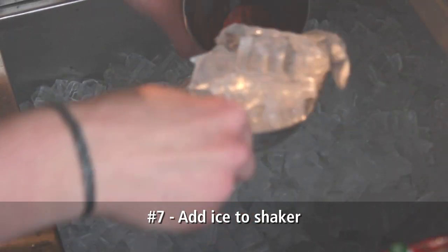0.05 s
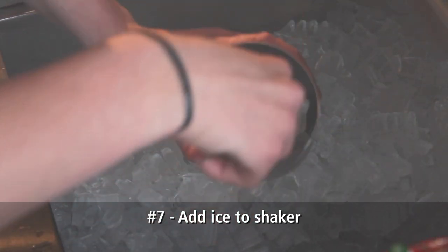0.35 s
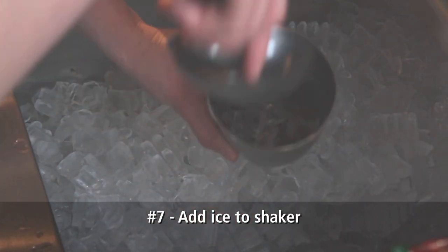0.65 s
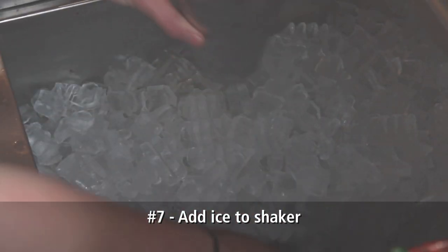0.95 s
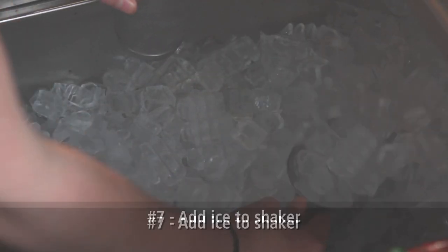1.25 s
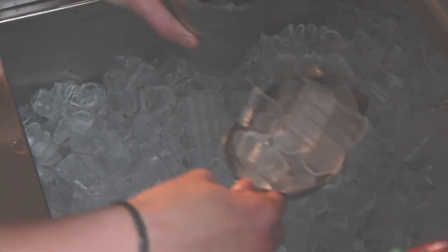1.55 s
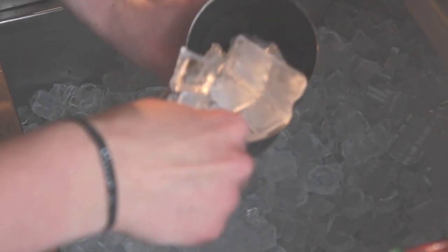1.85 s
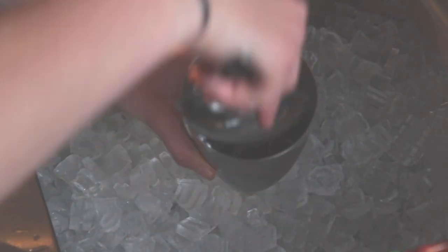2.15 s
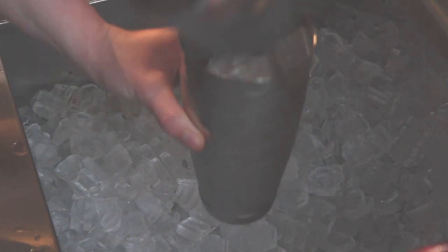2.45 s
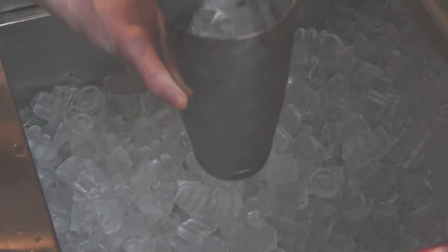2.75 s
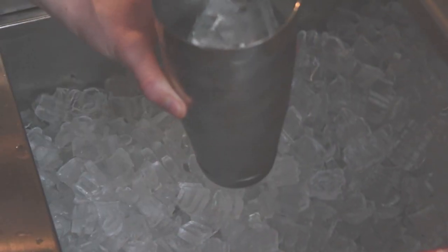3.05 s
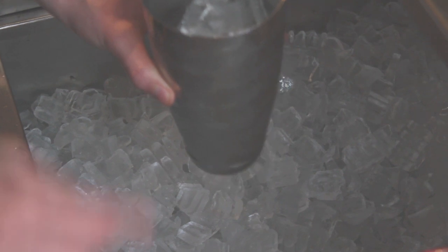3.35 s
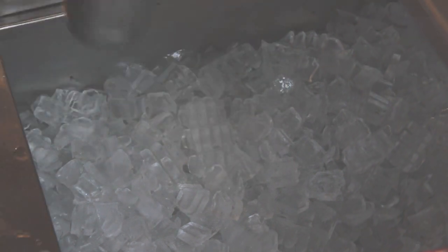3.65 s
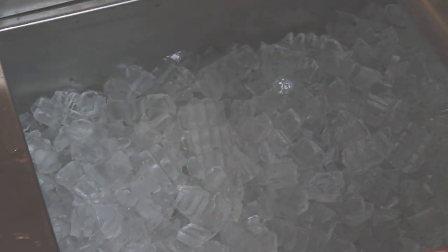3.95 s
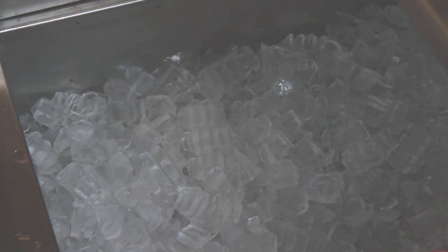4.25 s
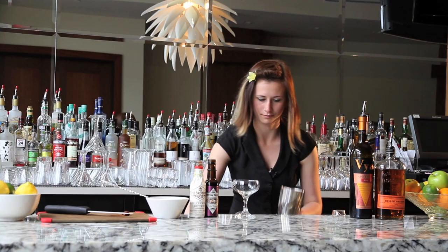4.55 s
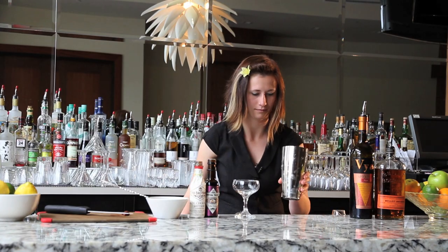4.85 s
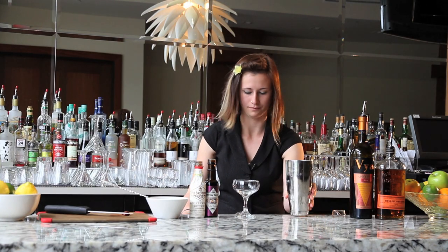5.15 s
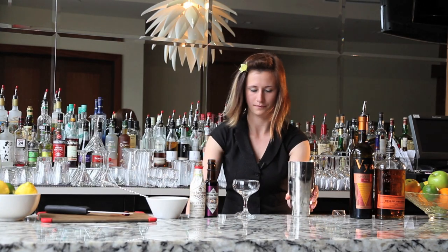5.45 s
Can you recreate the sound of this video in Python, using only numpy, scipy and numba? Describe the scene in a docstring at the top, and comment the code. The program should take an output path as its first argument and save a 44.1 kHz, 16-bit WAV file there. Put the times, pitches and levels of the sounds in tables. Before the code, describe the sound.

At a bar, two scoops of ice tumble into a metal shaker near the microphone, clinking and ringing, with a crunching dig into the ice bin between them. The shaker lands on the ice with a dry crack and some cubes settle. Then come a few more distant steel clanks with slight room echo and a light tap of the shaker on stone, over a quiet ventilation hum.

```python
"""Ice cubes are scooped from a bar's ice well and tipped twice into a steel shaker tin, close by.
Packed cubes crunch, loose ones clink, and single ones clack. They ring the tin's wall and the air inside,
whose pitch rises as it fills. Between pours the scoop is pushed back into the ice and the well booms.
Then, further off in the room, steel knocks and rattles at the well and the tin is set down on the stone
counter. A low rumble follows each jolt, and ventilation and coolers hum behind it all."""
import sys
import numpy as np
from scipy import signal
from scipy.fft import rfft, irfft, next_fast_len
from scipy.io import wavfile
from scipy.ndimage import uniform_filter1d
from numba import njit

SR = 44100
rng = np.random.default_rng(int(sys.argv[2]) if len(sys.argv) > 2 else 0)


def inscribe(sig):
    """Save sig as 16-bit PCM at rate SR to the path in sys.argv[1].

    A 1-D sig is mono; a 2-D sig holds one channel per row.
    Samples are clipped to [-1, 1] before scaling.
    """
    pcm = np.round(np.clip(np.atleast_2d(sig).T, -1, 1) * 32767)
    wavfile.write(sys.argv[1], SR, pcm.astype(np.int16))


N = 247797
TIME = np.arange(N) / SR

# How strong each pitch is when ice hits ice: pitch_hz, level_db
ICE_TONE = [(59, -36.5), (100, -10), (140, -1), (283, -4), (398, 1.5), (535, -2.5), (595, 2), (818, -5),
            (910, -4), (3620, -0.5), (6700, -3.5), (9820, -8), (13200, -5), (16000, -12)]
# The scoop is lifted, emptied, pushed back in, pulled free and emptied again; last, the well's ice slumps.
# start_s, rise_s, hold_s, level_db, fall_db_per_s, looseness (0 packed, 1 loose), lows_db, treble_db
ICE_MOVES = [(0, 0.0017, 0.092, -38, 80, 0.04, -6.5, -5.5),
             (0.336, 0.0082, 0.0034, -42, 128.5, 0.3, 1.5, -4),
             (0.446, 0.15, 0.029, -22, 139.5, 0.27, -13.5, -4),
             (0.928, 0.024, 0.17, -23.5, 222, 0.09, -8, -2), (1.124, 0.031, 0.41, -34, 352, 0.18, -7, -9),
             (1.595, 0.02, 0.021, -36, 171, 0.33, -8, -5.5),
             (1.72, 0.23, 0.005, -39, 257, 0.99, -3.5, -2.5),
             (1.979, 0.056, 0.009, -26, 167, 0.88, -13, -5.5),
             (2.081, 0.16, 0.0085, -25.5, 135, 0.72, -17.5, -4),
             (2.292, 0.036, 0.27, -38.5, 90, 0.82, -6.5, -3.5),
             (3.662, .02, 0.17, -60.5, 87, 0.9, -22.5, -14.5),
             (3.932, 0.063, 0.022, -31.5, 141, 0.82, -15.5, -3)]
def moving_ice():
    """Packed cubes crunch, loose ones tumble. As a move eases, its treble goes first, its lows last."""
    powers, loose = np.zeros((3, N)), np.zeros(N)
    for start, rise, hold, db, fall, looseness, lows_db, treble_db in ICE_MOVES:
        shape_db = swell(start, rise, hold, fall)
        power = undb([db + lows_db + .77 * shape_db, db + shape_db, db + treble_db + 1.3 * shape_db]) ** 2
        powers += power
        loose += looseness * power[1]
    loose = np.clip(loose / powers[1], 0, 1)
    crunch = collisions(per_s=2000, spread_db=2.5, cycles=50, ping_db=-2, crack_t60=.012)
    tumble = collisions(per_s=230, spread_db=2.5, cycles=110, ping_db=-1, crack_t60=.022)
    blend = np.sqrt(1 - loose) * unit(crunch) + np.sqrt(loose) * unit(tumble)
    parts = low_mid_high(through(blend, tone_filter(ICE_TONE)))
    return sum(np.sqrt(power) * steady(part) for power, part in zip(powers, parts))

def swell(start, rise, hold, fall_db_per_s, gather_db=14):
    """A movement builds, holds and dies away. Gives its level in dB, with 0 as full strength."""
    t = TIME - start
    db = -gather_db * np.clip(1 - t / rise, 0, 1) - fall_db_per_s * np.maximum(t - rise - hold, 0)
    return np.where(t < 0, -200, np.maximum(db, -200))

def collisions(per_s, spread_db, cycles, ping_db, crack_t60):
    """Cubes bump at random moments; each bump makes a crack and three short pings."""
    when, chance, life, *pitches = rng.random((16000, 6))[:int(per_s * N / SR)].T
    start = (when * N).astype(int)
    size = undb(-spread_db * np.log(np.maximum(chance, .02)))  # many small bumps, a few big ones
    size[::2] *= -1
    tone = 0
    for pitch in pitches:
        hz = 1300 * (15500 / 1300) ** pitch
        tone = tone + pings(start, hz, cycles * (.5 + life), size * hz, N)
    crack_power = through(np.bincount(start, size ** 2, N), fade(TIME[:SR // 10], crack_t60) ** 2)
    cracks = np.sqrt(np.abs(crack_power)) * rng.standard_normal(N)
    return unit(cracks) + undb(ping_db) * unit(tone)

@njit
def pings(start, hz, cycles, size, n):
    """Struck cubes ring: short tones that each lose 60 dB in the given number of cycles."""
    out = np.zeros(n)
    for k in range(len(start)):
        length = cycles[k] * SR / hz[k]
        wave = size[k] + 0j
        step = np.exp(2j * np.pi * hz[k] / SR - np.log(1000) / length)
        for i in range(start[k], min(start[k] + int(length), n)):
            wave *= step
            out[i] += wave.imag
    return out

# Single cubes hit the scoop, the tin or each other: start_s, level_db, pitch_hz, treble_db, chatter_s
CUBE_HITS = [(0.1441, -21, 2980, -11, 0.068), (0.2274, -23, 2660, -8.5, 0.077),
             (0.2845, -22.5, 3700, -18, 0.05), (0.3421, -23.5, 4700, -11, 0.05),
             (0.416, -14.5, 4870, -10, 0.12), (0.4787, -18.5, 4200, -8, 0.065),
             (0.5066, -14, 3200, -14, 0.034), (0.5574, -5, 3070, -15, 0.11),
             (0.7484, -18, 3610, -16, 0.036), (0.7905, -27, 3520, -4, 0.031), (0.9333, -11, 4440, -5, 0.15),
             (0.9928, -7, 3740, -2, 0.041), (1.0367, -9.5, 3290, -16.5, 0.064),
             (1.648, -18, 3060, -9, 0.056), (1.6785, -16, 3620, -21, 0.029),
             (1.7407, -24.5, 3560, -16, 0.05), (1.7539, -18.5, 4760, -15, 0.083),
             (1.7973, -20, 3780, -13, 0.072), (1.8203, -18.5, 4690, -13, 0.078),
             (1.8574, -18, 3710, -15, 0.038), (1.8923, -13, 2830, -4, 0.037),
             (1.9797, -9.5, 2225, -14, 0.05), (2.0081, -9, 2650, -8, 0.07), (2.0303, -9.5, 3870, -22, 0.08),
             (2.0426, -9, 2590, -9, 0.067), (2.375, -13.5, 3880, -39, 0.042),
             (2.4233, -19, 4860, -35, 0.05), (2.4718, -15.5, 3900, -17, 0.11),
             (2.517, -13, 4240, -11, 0.13), (2.5553, -15.5, 3620, -10, 0.097),
             (2.6913, -21, 5200, -4, 0.061), (2.7249, -21.5, 2520, 16, 0.023),
             (3.685, -40.5, 4700, -6.5, 0.056), (3.923, -20.5, 4090, -8.5, 0.035),
             (3.9789, -16.5, 4230, -3, 0.077)]
# The tin touches the ice, then rests its full weight: start_s, level_db, pitch_hz, lows_db, treble_db
TIN_LANDINGS = [(2.828, -21.5, 2500, -14, -12), (2.8549, -7.5, 3480, -4.5, 2)]
def clacks():
    """Single cubes land in the scoop and the tin; the tin itself lands on the ice with a dry crack."""
    out = np.zeros(N)
    for start, db, hz, treble_db, chatter_s in CUBE_HITS:
        hit = clack(hz, lows_db=-15, treble_db=treble_db + 6, chatter_s=chatter_s, ring_db=-2.5)
        add(out, start, undb(db - 10) * hit)
    for start, db, hz, lows_db, treble_db in TIN_LANDINGS:
        add(out, start, undb(db - 10.5) * clack(hz, lows_db, treble_db, chatter_s=.053, ring_db=-19))
    return out

def clack(hz, lows_db, treble_db, chatter_s, ring_db, ring_s=.036):
    """One blow on ice: a hard snap, chatter among the neighbours, and the cube's own short ring."""
    t = TIME[:SR // 5]
    flicker_db = 3 * np.repeat(rng.standard_normal(len(t) // 45 + 1), 45)[:len(t)]
    chatter = undb(flicker_db) * fade(t, chatter_s)
    snap = undb(-7) * fade(t, .0019)
    crack = rng.standard_normal(len(t)) * (chatter + snap)
    low, mid, high = low_mid_high(through(crack, tone_filter(ICE_TONE)))
    cube = ring([(hz, 0, ring_s), (hz * .86, -5, ring_s), (hz * 1.62, -6, ring_s / 2)], t)
    body = unit(unit(mid) + undb(ring_db) * unit(cube))
    hit = body + undb(lows_db) * unit(low) + undb(treble_db) * unit(high)
    return hit / np.std(hit[:SR // 250])  # the first 4 ms set the level

# Each scoopful falling into the tin: start_s, fill_s, air_before_hz, air_after_hz, air_db, wall_db
SCOOPFULS = [(.478, .25, 468, 660, -5, -2.5), (1.978, .7, 592, 620, -13, -6)]
# The notes of the air in the tin: times_lowest_pitch, width_hz, level_db
AIR_NOTES = [(1, 45.5, 3.5), (2.15, 71.6, -8), (3.4, 69, 0), (4.3, 110, -4)]
# The notes of the tin's wall, muffled by the hand: pitch_hz, width_hz, level_db
WALL_NOTES = [(1367, 42, 3), (1584, 23, -6.5), (2030, 9.7, 5), (2050, 18, 6), (2580, 34, -3.5),
              (2790, 33, 0), (3082, 35, 8), (3390, 89, 6), (4310, 63, 5.5), (4250, 21, -0.5),
              (5160, 34, -11.5), (6280, 80, -14.5)]
def filling_tin(spill_s=.08):
    """Falling cubes ring the tin's wall and the air inside; the last ones spill in just after the fill."""
    bumps = collisions(per_s=500, spread_db=3, cycles=30, ping_db=-15, crack_t60=.006)
    wall = ringing_body(bumps, WALL_NOTES)
    out = np.zeros(N)
    for pour in SCOOPFULS:
        start, fill_s, _, _, air_db, wall_db = pour
        lowest_hz = air_pitch(pour)
        air = ringing_body(bumps, [(lowest_hz * times, width, db) for times, width, db in AIR_NOTES])
        pouring = np.clip((start + fill_s + spill_s - TIME) / spill_s, 0, 1) * (TIME > start)
        out += pouring * (air * undb(air_db) + wall * undb(wall_db))
    moving_power = sum(undb(db + swell(start, rise, hold, fall)) ** 2
                       for start, rise, hold, db, fall, *_ in ICE_MOVES)
    return out * np.sqrt(moving_power)

def air_pitch(pour):
    """The lowest note of the air in the tin climbs, ever faster, as ice takes up the space."""
    start, fill_s, before_hz, after_hz = pour[:4]
    progress = np.clip((TIME - start) / fill_s, 0, 1)
    return before_hz * (after_hz / before_hz) ** (progress ** 2)

# Heavy cubes that drop deep into the tin: start_s, air_db, bottom_db
HEAVY_CUBES = [(0.4775, -21, -28), (0.506, -35, -20), (0.557, -19, -18), (1.978, -18, -28)]
def deep_drops(bottom_hz=1590, bottom_t60=.13, air_t60=.09):
    """A cube reaches the tin's bottom: the steel rings and the air gives a hollow knock."""
    out, t = np.zeros(N), TIME[:SR // 4]
    for start, air_db, bottom_db in HEAVY_CUBES:
        nearest_pour = min(SCOOPFULS, key=lambda pour: abs(pour[0] - start))
        air_hz = air_pitch(nearest_pour)[int(start * SR)]
        add(out, start, ring([(air_hz, air_db, air_t60), (bottom_hz, bottom_db, bottom_t60)], t))
    return undb(-1) * out

# The scoop's push, passed through the ice to the well: start_s, rise_s, hold_s, level_db, fall_db_per_s
SCOOP_PUSH = (.95, .12, .015, -29, 170)
# The low notes of the well's steel floor: pitch_hz, width_hz, level_db
WELL_NOTES = [(145, 18, -3.5), (190, 24, -4.5), (417, 15, -5)]
def well_boom():
    """The well's floor booms while the scoop is driven into the ice."""
    start, rise, hold, db, fall = SCOOP_PUSH
    boom = ringing_body(rng.standard_normal(N), WELL_NOTES)
    return boom * undb(db + swell(start, rise, hold, fall))

# Blows at the well: start_s, level_db, lows_db, treble_db, clatter_s, ring_db, ring_length (1 is full)
STEEL_BLOWS = [(4.463, -4, -37.5, -33, 0.051, -12, 0.64), (4.518, -27.5, -0.5, -22, 0.25, 3, 1),
               (4.614, -12.5, -14, -3, .047, -4, 1), (4.629, -10, 3.5, -0.5, 0.091, -5, 0.8),
               (4.744, -7, 2, -12.5, 0.08, -5, 0.51), (4.783, -30.5, -16, 2, .076, 5.5, 1),
               (4.8007, -13.5, 4.5, 9, .22, -3, 0.56)]
# The main notes of the steel sheet: pitch_hz, level_db, fade_s
STEEL_NOTES = [(153.3, -5.5, 0.75), (303.2, -7.5, 0.6), (396, -4, 0.4), (507, 6, 0.29), (758, 2.5, 0.25),
               (997, 6.5, 0.46), (1090, -12, 0.24), (1124, -5, 0.14), (1227, 11, 0.13), (1820, 5.5, 0.11),
               (2000, -23, 0.061), (2150, -5, 0.18), (2440, -17, 0.81), (2880, -2.5, 0.13),
               (3120, -10, 0.13), (3390, -6, 0.38), (3800, -24, .3), (4340, 7, 0.045), (4500, -10, 0.2),
               (5210, -8.5, 0.18), (5715, -23, .2), (6240, -27, .3), (7050, -18, 0.84), (7740, -5, 0.21),
               (9950, -18, 0.14)]
# How strong each pitch is in the clatter: pitch_hz, level_db
CLATTER_TONE = [(59, -40), (100, -7), (271, -15), (481, -4), (634, -11.5), (1230, -2), (1450, -15),
                (1760, -8.5), (2470, -14.5), (4570, -18.5), (9610, -28), (10700, -24), (16000, -38)]
def steel_knocks(clatter_db=-8, notes_db=-19, buzz_db=-3, scatter_db=2, detune=.005):
    """Steel meets steel: a brief clatter, then the sheet rings on in its main notes and many weak ones."""
    out, t = np.zeros(N), TIME[:SR * 2 // 3]
    tone = tone_filter(CLATTER_TONE)
    weak_notes = [(hz, -38 - 10 * np.log10(hz / 4000), .2) for hz in rng.uniform(1200, 15500, 60)]
    for start, db, lows_db, treble_db, clatter_s, ring_db, ring_length in STEEL_BLOWS:
        clatter = through(rng.standard_normal(len(t)) * fade(t, clatter_s), tone) / np.linalg.norm(tone)
        contacts = rng.standard_normal(len(t)) * fade(t, clatter_s)
        contacts *= undb(buzz_db) / np.linalg.norm(contacts)
        contacts[0] += 1  # the blow itself, ahead of the buzz
        # The grip shifts each pitch, the spot struck shifts each level, and touching steel cuts the ring.
        chance = rng.standard_normal((len(STEEL_NOTES), 2))
        notes = [(hz * (1 + detune * grip), note_db + notes_db + scatter_db * spot, fade_s * ring_length)
                 for (hz, note_db, fade_s), (grip, spot) in zip(STEEL_NOTES, chance)]
        sheet = through(contacts, ring(notes, t) + ring(weak_notes, t))
        hit = undb(clatter_db) * clatter + undb(ring_db) * sheet
        # Each blow has its own amount of low thud and bright treble.
        lows = signal.sosfilt(signal.butter(1, 450, fs=SR, output="sos"), hit)
        treble = signal.sosfilt(signal.butter(1, 4500, "high", fs=SR, output="sos"), hit)
        add(out, start, undb(db) * (hit + (undb(lows_db) - 1) * lows + (undb(treble_db) - 1) * treble))
    return out

# The notes of the tin's base: pitch_hz, level_db, fade_s
BASE_NOTES = [(646, 8, 0.061), (788, -1.5, 0.062), (1095, 2.5, 0.018), (1390, 3.5, 0.017),
              (2340, -4.5, 0.035), (2460, -4.5, 0.02), (3720, -19.5, 0.028), (4340, -28, .04),
              (4510, -7, 0.052), (4800, -4, 0.0087), (6960, -34, 0.037), (7570, -10.5, 0.03),
              (11500, -11, 0.033), (15100, -15.5, .02)]
def tin_on_counter(start_s=5.2505):
    """The tin taps the stone with a tick; the hand and the ice quickly stop its base ringing."""
    out, t = np.zeros(N), TIME[:SR // 2]
    base = ring(BASE_NOTES, t)
    tick = unit(band(rng.standard_normal(len(t)), 400, 3200, order=1)) * fade(t, .0049)
    add(out, start_s, undb(-25.5) * (base + undb(-4) * tick))
    return out

# Sound bouncing off the walls and the back bar: delay_s, level_db
WALL_BOUNCES = [(.027, -13), (.042, -16.5), (.062, -25), (.105, -21)]
def echoes(x):
    """Separate echoes, dulled by the surfaces they bounce off."""
    out, dull = np.zeros(N), band(x, 200, 2500, order=1)
    for delay_s, db in WALL_BOUNCES:
        add(out, delay_s, undb(db) * dull)
    return out

def reverb(x, level_db, fades_s=(.5, .44, .26), build_s=.015):
    """Many echoes blur into a tail. Lows, middle and treble each have a fade time; treble dies first."""
    t = TIME[:SR]
    parts = low_mid_high(rng.standard_normal(len(t)))
    tail = sum(part * fade(t, fade_s) for part, fade_s in zip(parts, fades_s))
    tail *= 1 - np.exp(-(t / build_s) ** 2)
    return undb(level_db) * through(x, tail / np.linalg.norm(tail))

def handling_rumble(jolts, linger_s=.077):
    """A low rumble of handling that swells with every jolt and lingers a moment."""
    tail = fade(TIME[:SR // 2], linger_s) ** 2
    strength = np.sqrt(np.abs(through(jolts ** 2, tail / tail.sum())))
    return undb(-28) * unit(band(rng.standard_normal(N), 22, 52)) * strength ** .57

# How strong each pitch is in the bar's steady background: pitch_hz, level_db
VENT_TONE = [(25, -17), (60, -8.5), (95, -1.5), (145, -11.5), (180, -8), (215, -13.5), (263, -11),
             (354, -9.5), (516, -18), (936, -20), (2550, -31), (3720, -37), (5280, -40), (16000, -46.5)]
def vents_and_coolers(vent_db=-53.5, hum_db=-63):
    """The rush of the ventilation and the wavering hum of the coolers."""
    hum = sum(unit(band(rng.standard_normal(N), hz - 2, hz + 2)) for hz in (120, 180))
    rush = unit(through(rng.standard_normal(N), tone_filter(VENT_TONE)))
    return undb(vent_db) * rush + undb(hum_db) * hum

def ring(notes, t):
    """A struck object's fading notes; each starts up or down depending on where the blow lands."""
    return sum(rng.choice([-1, 1]) * undb(db) * fade(t, fade_s) * np.sin(2 * np.pi * hz * t)
               for hz, db, fade_s in notes)

def ringing_body(shaking, notes):
    """Something shaken nonstop rings at its own notes; the result is held at an even level."""
    return steady(sum(undb(db) * resonate(shaking, hz * np.ones(N), float(width))
                      for hz, width, db in notes))

@njit
def resonate(x, hz, width_hz):
    """Keep the part of x near one pitch, which may move (a state-variable filter)."""
    out, band_state, low_state = np.empty(len(x)), 0., 0.
    for i in range(len(x)):
        tuning, damping = np.tan(np.pi * hz[i] / SR), width_hz / hz[i]
        swing = (band_state + tuning * (x[i] - low_state)) / (1 + tuning * (tuning + damping))
        band_state = 2 * swing - band_state
        low_state += 2 * tuning * swing
        out[i] = damping * swing
    return out

def tone_filter(points):
    """Turn (pitch_hz, level_db) points into a click with that tone, for use with through()."""
    hz, db = np.transpose(points)
    gain = undb(np.interp(np.log(np.linspace(1, SR / 2, 2049)), np.log(hz), db))
    cepstrum = irfft(np.log(gain))
    cepstrum[1:2048] *= 2  # folded onto its first half, so nothing sounds before the hit
    cepstrum[2049:] = 0
    return irfft(np.exp(rfft(cepstrum)))

def through(x, response):
    """Give every sample of x the given response (convolution)."""
    return signal.fftconvolve(x, response)[:len(x)]

def low_mid_high(x):
    """Split x into lows, middle and treble, which add up to x again."""
    size = next_fast_len(len(x) + 2048)
    hz, spectrum = np.linspace(0, SR / 2, size // 2 + 1), rfft(x, size)
    low = 1 / (1 + (hz / 1350) ** 6)
    high = 1 - 1 / (1 + (hz / 7500) ** 8)
    return [irfft(spectrum * share, size)[:len(x)] for share in (low, 1 - low - high, high)]

def band(x, low_hz, high_hz, order=2):
    """Keep the pitches between two limits."""
    return signal.sosfilt(signal.butter(order, [low_hz, high_hz], "band", fs=SR, output="sos"), x)

def steady(x):
    """Even out the level over 40 ms, so single bumps still stand out."""
    return x / np.sqrt(np.abs(uniform_filter1d(x ** 2, int(.04 * SR))) + 1e-12)

def fade(t, t60):
    """A fade that loses 60 dB in t60 seconds."""
    return np.exp(-np.log(1000) * t / t60)

def undb(db):
    """Turn decibels into a number to multiply by."""
    return 10 ** (np.asarray(db) / 20)

def unit(x):
    """Scale x to an average (rms) level of 1."""
    return x / (np.std(x) + 1e-12)

def add(out, start_s, x):
    """Mix x into out, beginning at start_s."""
    i = int(start_s * SR)
    out[i:i + len(x)] += x[:N - i]

def scene():
    """Close ice between the walls of the well; more distant steel with the room around it."""
    sliding, cubes = moving_ice(), clacks()
    ice = sliding + filling_tin() + deep_drops() + cubes + well_boom()
    ice += reverb(ice, level_db=-18, fades_s=(.076, .095, .03), build_s=.004)
    steel, tin = steel_knocks(), tin_on_counter()
    far = steel + reverb(steel, level_db=-13) + tin + echoes(tin) + reverb(tin, level_db=-9)
    jolts = undb(-6) * sliding + undb(8) * cubes + undb(-8) * far
    return (ice + far + handling_rumble(jolts) + vents_and_coolers())[None]

def record(dry):
    """Cut off the very highest treble, above 15750 Hz."""
    return signal.sosfilt(signal.ellip(10, .2, 80, 15750, fs=SR, output="sos"), dry)

dry = scene()
out = record(dry)
inscribe(out)
```